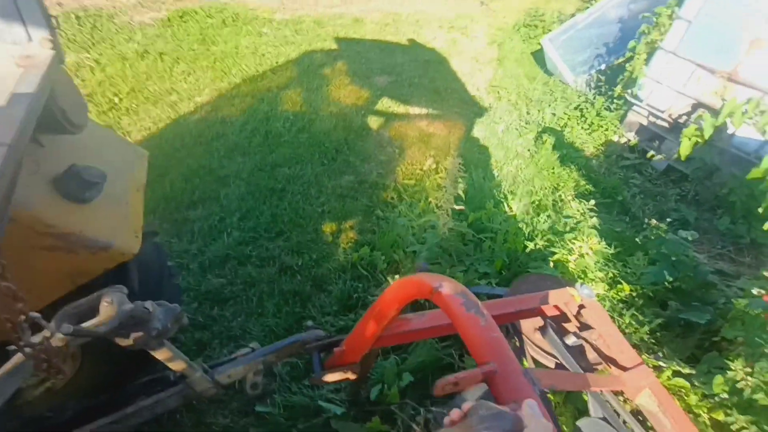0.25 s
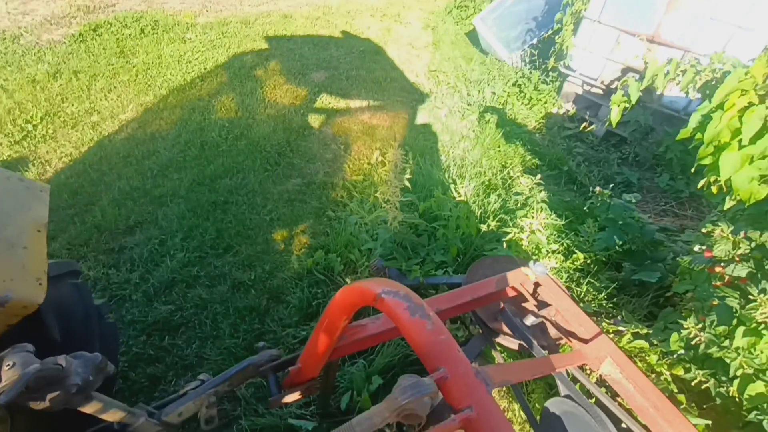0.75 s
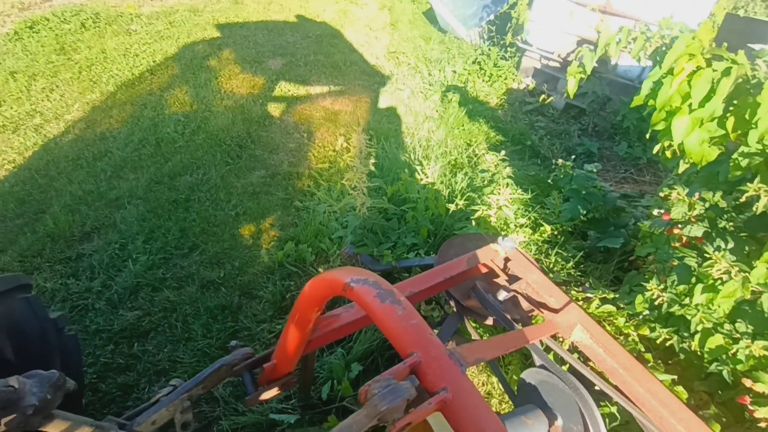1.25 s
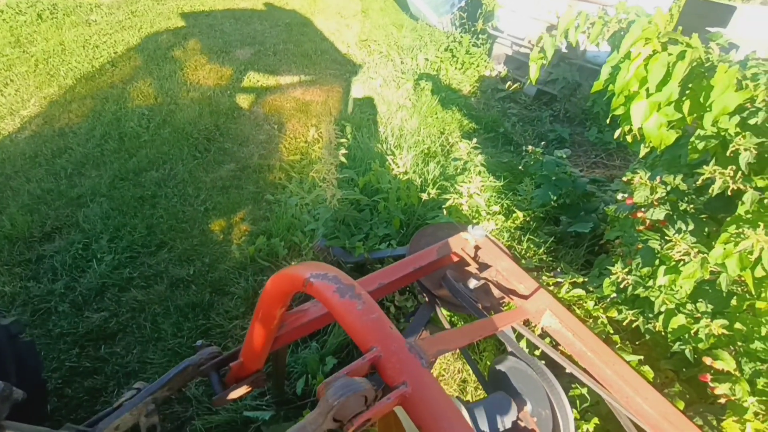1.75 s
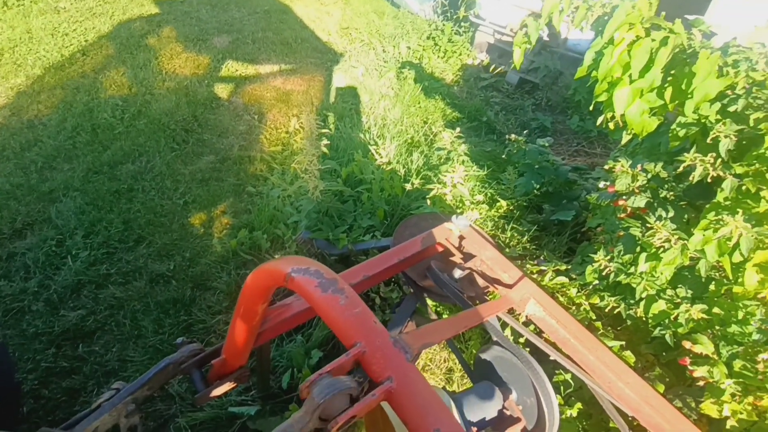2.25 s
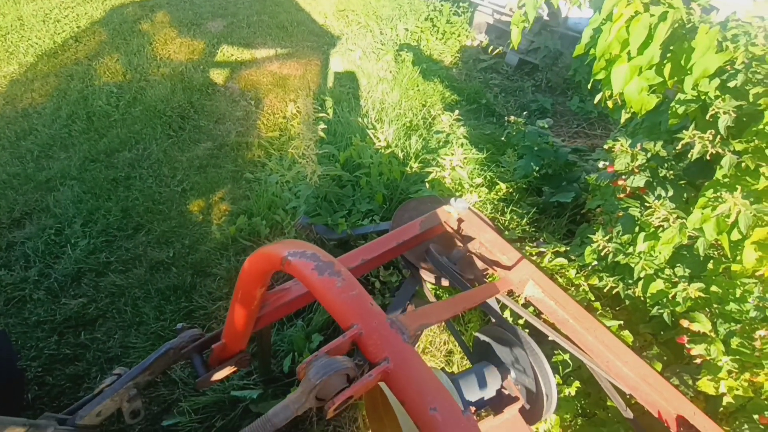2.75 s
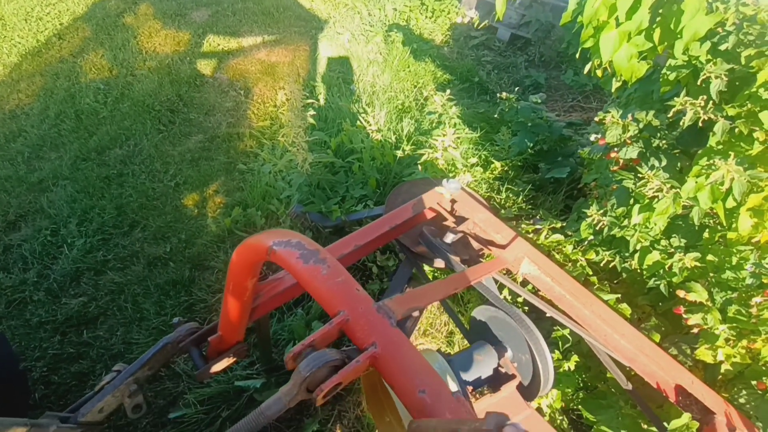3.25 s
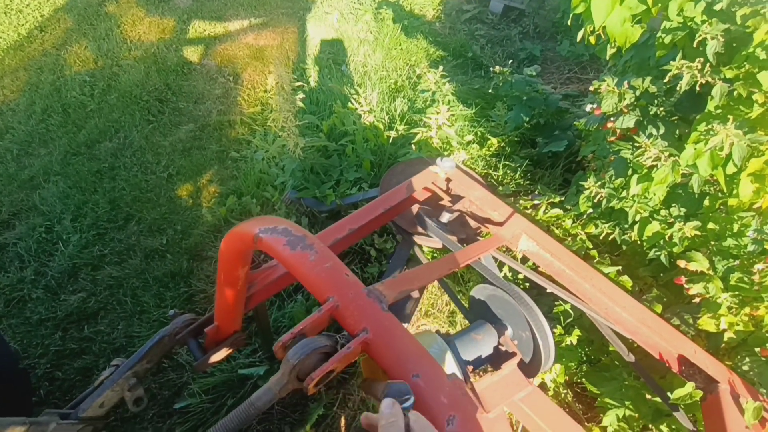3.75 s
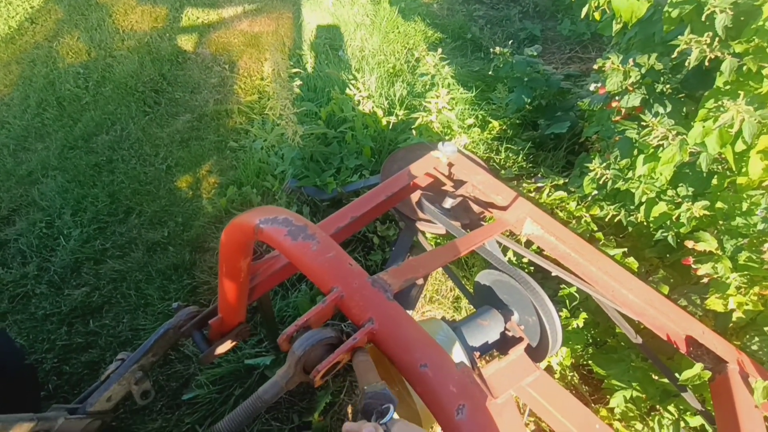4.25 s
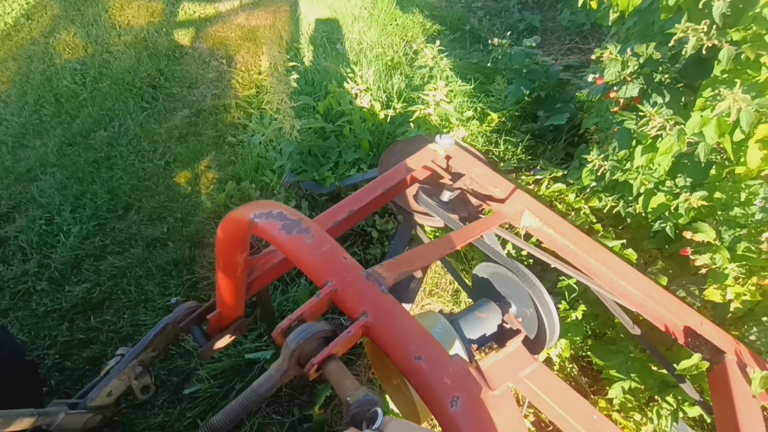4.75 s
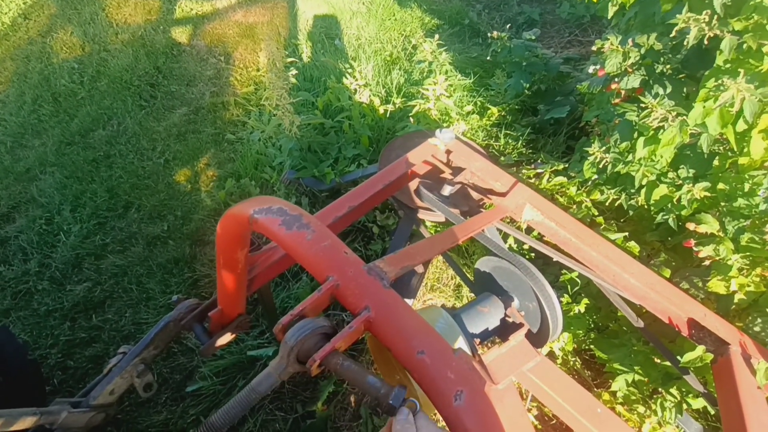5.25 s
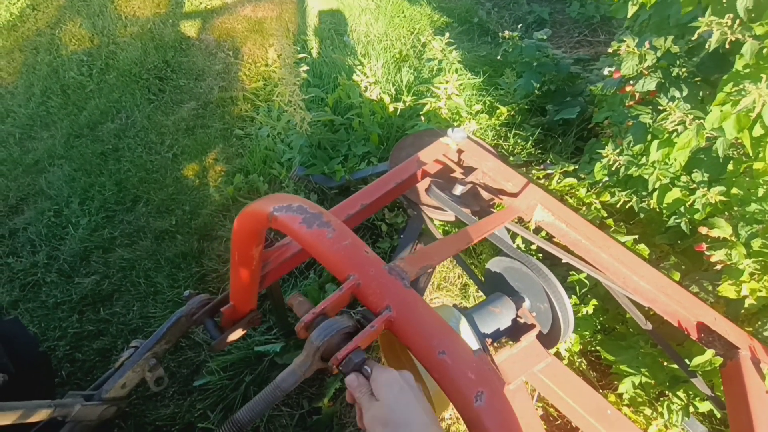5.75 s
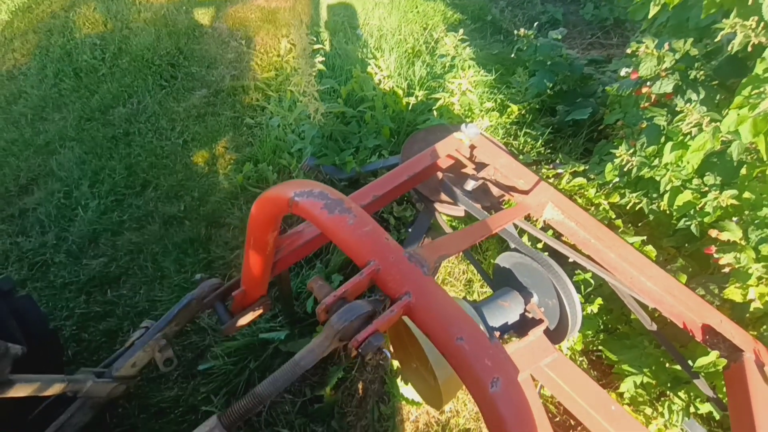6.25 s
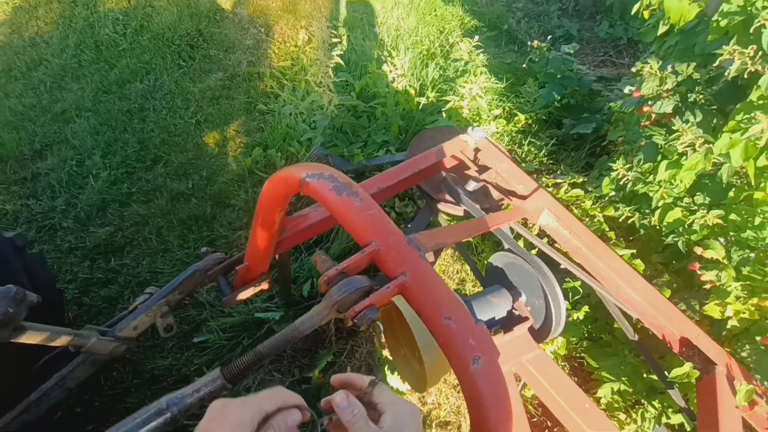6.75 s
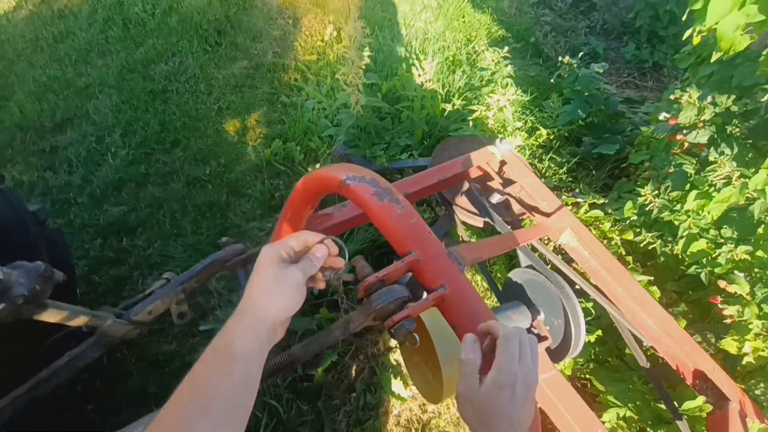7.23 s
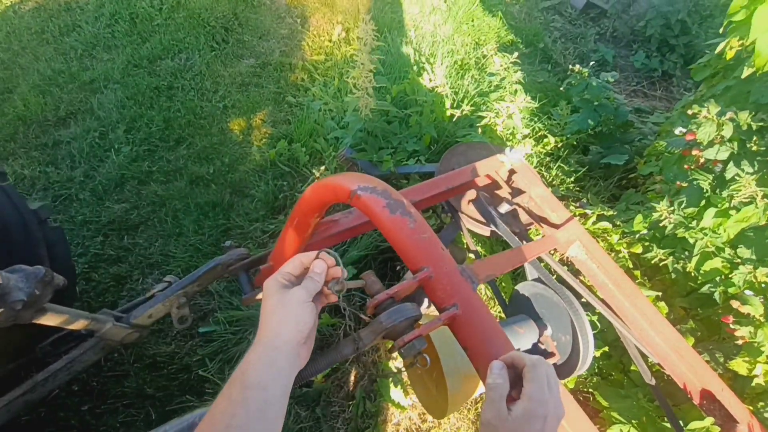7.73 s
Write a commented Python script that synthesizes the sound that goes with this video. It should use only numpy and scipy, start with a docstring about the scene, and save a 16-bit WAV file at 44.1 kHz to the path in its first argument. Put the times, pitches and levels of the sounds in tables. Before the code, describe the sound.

A diesel tractor idles very slowly a few metres to the left, with low exhaust thumps, rattling knocks and light ticking. Close in front, a steel hitch link is turned by hand, giving irregular sharp clanks that ring briefly. Near the end the clanks stop and a small metal pin clinks a few times. The engine runs evenly throughout, outdoors on open grass.

```python
"""A diesel tractor idles very slowly, a few metres to the left, on open grass. In each cycle three strong gas
pulses and a faint one excite the silencer's low resonance as thumps. Impacts in the block make four rattling
knocks with lighter ones between, the injector ticks sharply as each cycle opens, and the valve gear ticks.
Close by, the steel top link of the hitch is turned by hand: impacts in its loose joints set its modes ringing
as clanks, and its pin clinks."""
import sys
import numpy as np
from scipy import signal
from scipy.fft import rfft, irfft
from scipy.io import wavfile
from scipy.ndimage import uniform_filter1d

SR = 44100
rng = np.random.default_rng(int(sys.argv[2]) if len(sys.argv) > 2 else 0)


def waveform_to_disk(signal):
    """Save audio, clipped to [-1, 1], as 16-bit WAV at the path in sys.argv[1]."""
    frames = np.transpose(np.atleast_2d(signal))
    scaled = np.clip(frames, -1, 1) * 32767
    samples = np.round(scaled).astype(np.int16)
    wavfile.write(sys.argv[1], SR, samples)


N = 352344
TIME = np.arange(N) / SR
TAIL = TIME[:SR // 2]  # time since an impact


def undb(db):
    """Amplitude ratio of a level in decibels."""
    return 10 ** (np.asarray(db) / 20)


def unit(x):
    """Normalisation to rms 1."""
    return x / np.sqrt(np.mean(x ** 2))


def unit_onset(x, size=1024):
    """Normalisation to rms 1 over the onset."""
    return x / np.sqrt(np.mean(x[:, :size] ** 2))


def fade(t, t60):
    """Damping: exponential decay, 60 dB down after t60."""
    return np.exp(-np.log(1000) * t / t60)


def add(out, start, x):
    """Superposition of x on out from a start time in seconds."""
    i = int(start * SR)
    a, b = max(i, 0), min(i + x.shape[-1], N)
    if b > a:
        out[..., a:b] += x[..., a - i:b - i]


def colour(x, hz, db, size=1024):
    """Minimum-phase filter through (frequency, level) points."""
    f = np.maximum(np.arange(size // 2 + 1) * SR / size, 1)
    cepstrum = irfft(np.log(undb(np.interp(np.log(f), np.log(hz), db))))
    cepstrum[1:size // 2] *= 2
    cepstrum[size // 2 + 1:] = 0
    response = irfft(np.exp(rfft(cepstrum)))
    return signal.fftconvolve(x, response[None], axes=-1)[:, :x.shape[-1]]


def resonate(x, hz, q):
    """Forced response of a single resonance."""
    return signal.lfilter(*signal.iirpeak(hz, q, SR), x)


# Limits of the body, middle, edge, sheen and top bands: (frequency [Hz])
BAND_EDGES = np.array([400, 1100, 2400, 4400, 7000, 12000])

def shape_bands(x, band_db, bass_db, air_db):
    """Spectral envelope: five band levels for a white sound, with offsets at the two ends."""
    density_db = np.asarray(band_db) - 10 * np.log10(np.diff(BAND_EDGES) / (SR / 2))
    centres = np.sqrt(BAND_EDGES[1:] * BAND_EDGES[:-1])
    return colour(x, [150, *centres, 14000], [density_db[0] + bass_db, *density_db, density_db[-1] + air_db])


def grit(spread_db, scatter):
    """Contact noise: dense clicks of uneven size, partly scattered differently to each side."""
    noise = rng.standard_normal((3, len(TAIL))) * undb(spread_db * rng.standard_normal(len(TAIL)))
    return unit(noise[0] + scatter * noise[1:])


def ring(modes, vary_db, scatter):
    """Free vibration: a sum of damped modes, weighted anew for each blow and each side."""
    hz, db, t60 = np.transpose(modes)
    chance = rng.standard_normal((6, len(hz)))
    weight = undb(db + vary_db * chance[0]) * np.exp(2j * np.pi * chance[1])
    sides = 1 + scatter * (chance[2:4] + 1j * chance[4:])
    partials = np.exp(2j * np.pi * hz[:, None] * TAIL) * fade(TAIL, t60[:, None])
    return ((weight * sides) @ partials).imag


# Modes of the pin's spring ring and of its shank: (frequency [Hz], level [dB], t60 [s])
SPRING_MODES = [(4441, -13, .2), (5798, 1, .07), (7192, -4, .055), (8215, -22, .12), (10933, -16, .08),
                (13991, -14, .05), (15407, -23, .05)]
SHANK_MODES = [(1700, -16, .04), (3219, -15, .06), (4156, -12, .05), (4603, -8, .04), (6200, -10, .03),
               (6562, -6, .022), (6950, 0, .012), (7120, 2, .016), (7350, -2, .012), (9588, -11, .022)]
# Taps of the pin: (time [s], level [dB], spring gain [dB], shank gain [dB])
CLINKS = [(5.984, -30.5, -15, -2), (7.161, -49.5, 6, -13), (7.181, -36, -2, -22), (7.187, -28.5, -2.5, -21),
          (7.466, -50, -1, -10), (7.526, -46.5, -7, -5), (7.751, -51, 2.5, -7), (7.918, -47.5, -4, -7)]

def pin_clinks():
    """Impact excitation: the well-damped shank clicks and the lightly damped spring rings."""
    out = np.zeros((2, N))
    for start, db, spring_db, shank_db in CLINKS:
        shank = unit_onset(ring(SHANK_MODES, vary_db=2, scatter=.15))
        shank += .12 * unit_onset(grit(spread_db=1, scatter=.4) * fade(TAIL, .012))
        spring = unit_onset(ring(SPRING_MODES, vary_db=1, scatter=.1) * np.minimum(TAIL / .0015, 1))
        add(out, start, undb(db) * (undb(spring_db) * spring + undb(shank_db) * shank))
    return out


def frame_ring(chatter, low_t60=.38, middle_t60=.16, top_t60=.076):
    """Frequency-dependent damping: once chatter ends, the frame's dense modes lose their treble first."""
    noise = grit(spread_db=1, scatter=1.77)
    noise = colour(noise, np.geomspace(500, 14000, 110), 4 * rng.standard_normal(110))
    low, below_top = (signal.sosfiltfilt(signal.butter(2, hz, fs=SR, output="sos"), noise)
                      for hz in (1300, 5500))
    middle, top = below_top - low, noise - below_top
    free = np.maximum(TAIL - chatter, 0)
    return low * fade(free, low_t60) + middle * fade(free, middle_t60) + top * fade(free, top_t60)


def joint_contacts(chatter, rate_hz=260, settle_s=.029, jolt=.15):
    """Stick-slip envelope: the joint hits, then slips and catches, and the energies add."""
    times = np.append(0, rng.uniform(0, chatter, int(rate_hz * chatter) + 1))
    age = TAIL - times[:, None]
    strength = np.append(1.5, rng.uniform(.21, 1, len(times) - 1))
    decays = (age >= 0) * np.exp(-np.abs(age) / settle_s)
    return np.sqrt(1 + jolt * strength @ decays)


# Colour common to all clanks, middle to top band: (gain [dB])
CLANK_COLOUR = [2.5, -1, -0.87, -6.5]

def clank_bands(db, pitch_hz, focus, thud_db):
    """Resonance curve: band levels form a hump around the contact's pitch, above the frame's thud."""
    hz = np.sqrt(BAND_EDGES[2:] * BAND_EDGES[1:-1])
    hump_db = -10 * np.log10(1 + (focus * (hz / pitch_hz - pitch_hz / hz)) ** 2)
    return [thud_db, *(db + hump_db + CLANK_COLOUR)]


def balance_blow(blow, band_db, chatter):
    """Energy distribution: the onset of a blow is brought towards the given band levels."""
    size = int(max(chatter, .023) * SR)
    hz, gain_db = np.fft.rfftfreq(size, 1 / SR), np.array(band_db, float)
    for _ in range(2):
        onset = shape_bands(blow, gain_db, bass_db=-8, air_db=-22)[:, :size]
        power = 2 * np.mean(np.abs(rfft(onset) / size) ** 2, axis=0)
        band_power = np.histogram(hz, BAND_EDGES, weights=power)[0]
        gain_db = gain_db + band_db - 10 * np.log10(band_power)
    return shape_bands(blow, gain_db, bass_db=-15.5, air_db=-22)


# Modes of the link's tube and of its bracket: (frequency [Hz], level [dB], t60 [s])
TUBE_MODES = [(865, -14, .4), (935, -16, .35), (1070, -14, .18), (1227, -13, .22), (1348, -8, .27),
              (1466, -11, .33), (1521, -5, .15), (2232, -1, .19), (2739, -7, .17), (2854, -3, .2),
              (2902, -10, .25), (3214, -12, .22), (3411, -9, .13), (3640, -9, .1), (3790, -10, .1),
              (4002, -4, .11), (4150, -8, .09), (4385, -7, .1), (4786, -15, .18), (5733, -15, .11),
              (7187, -18, .12), (8220, -13, .12)]
BRACKET_MODES = [(593, -17, .3), (1520, -14, .15), (1636, -16, .15), (2659, -12, .17), (3030, -8, .19),
                 (3150, -11, .15), (3500, -11, .11), (3890, -9, .15), (4310, -9, .12), (4385, -8, .15),
                 (4594, 0, .14), (5120, -10, .16), (5370, -12, .12), (5960, -12, .09), (6300, -7, .09),
                 (6460, -5, .1), (7230, -12, .08), (8190, -11, .1), (9232, -15, .1)]
# Impacts of the link: (time [s], chatter [s], level [dB], pitch [Hz], focus [Q], frame thud [dB])
CLANKS = [(.559, 0.012, -22, 3230, 2, -40.5), (.588, 0.013, -33, 2210, 1.25, -41),
          (.781, 0.013, -19, 4570, 5.3, -53), (.947, 0.019, -29.5, 4440, 1.5, -31.5),
          (.972, .008, -36, 1410, 3.4, -34), (1.305, 0.015, -24.5, 3800, 3.1, -50),
          (1.314, 0.015, -19.5, 4690, 1.05, -36), (1.804, 0.012, -39.5, 3520, 2.4, -56),
          (2.0, 0.062, -48, 2910, 2.9, -52), (2.067, 0.016, -28.5, 3830, 5.5, -55),
          (2.279, 0.027, -41, 2800, 2.7, -67), (2.371, 0.044, -40, 3000, 3, -45),
          (3.174, 0.0073, -14.5, 4760, 2.27, -50), (3.274, 0.019, -30, 1820, 0.86, -32.5),
          (3.737, .012, -24, 3370, 1.44, -38), (3.866, 0.014, -20, 2600, 1.28, -33),
          (4.089, 0.019, -24, 2940, 5, -39), (4.662, 0.062, -39, 2800, 4.7, -58),
          (4.712, .011, -35, 2140, 2.6, -40.5), (4.829, 0.013, -27.5, 3030, 1.77, -38),
          (4.991, 0.016, -40.5, 2180, 2.1, -44), (5.161, 0.037, -29.5, 2580, 3.34, -40),
          (5.617, 0.024, -26, 2920, 2.6, -33.5), (5.675, 0.031, -32, 2480, 1.3, -34.5),
          (5.735, 0.046, -30, 2400, 4.2, -38), (5.802, 0.0092, -25, 4500, 1.05, -29),
          (5.822, .01, -40.5, 1200, 2.1, -38)]

def link_clanks(middling_hz=3125, middling_q=2.15):
    """Modal ringing: the link drops across its slack and excites frame, tube, bracket and joint."""
    out = np.zeros((2, N))
    for start, chatter, db, hz, focus, thud_db in CLANKS:
        # Higher clanks favour the bracket over the tube and lie further left.
        octaves = np.log2(hz / middling_hz)
        tube_db, bracket_db = -3.5 - 15.5 * max(octaves, 0), -11.5 + 13 * octaves
        pan_db = -2.5 + 2 * octaves
        ring_db = 2.5 * np.log2(focus / middling_q)  # focused clanks ring more strongly
        tube = undb(tube_db) * unit_onset(ring(TUBE_MODES, vary_db=1.5, scatter=.67))
        bracket = undb(bracket_db) * unit_onset(ring(BRACKET_MODES, vary_db=-.5, scatter=.52))
        frame = unit_onset(frame_ring(chatter) * joint_contacts(chatter))
        swell = 1 - np.exp(-4 * TAIL / chatter)
        blow = frame + undb(ring_db) * swell * (tube + bracket)
        ping = undb(-6 + 2 * ring_db) * resonate(blow, hz, q=11)
        clank = balance_blow(blow + ping, clank_bands(db, hz, focus, thud_db), chatter)
        add(out, start, clank * undb([[pan_db / 2], [-pan_db / 2]]))
    return out


# Drift of the idle: (time [s], lag [s], exhaust gain [dB], clatter gain [dB], valve gain [dB])
IDLE = [(-.25, -0.0043, -27.5, 2.5, 1.5), (.72, 0.0025, -30.5, 2, 2.5), (1.899, 0.0052, -31.5, 0, 2.5),
        (3.14, 0.00057, -32, -2, -0.5), (4.0, -0.0043, -34.5, -2, 6), (4.799, 0.0027, -31, -0.5, -4.5),
        (5.799, -.001, -32.5, -1, 8), (6.52, 0, -31, -0.5, -6.5), (7, 0.0051, -30.5, 1, 1.5),
        (7.97, -0.0036, -32.5, .5, -14)]

def engine_cycles(period_s=.48364, first_s=.2377):
    """Governor hunting modulates an even beat: rows of (start, exhaust, clatter and valve gains)."""
    beat = first_s + period_s * np.arange(-1, N / SR / period_s)
    times, *controls = np.transpose(IDLE)
    lag, *levels = (np.interp(beat, times, control) for control in controls)
    return np.transpose([beat + lag, *levels])


# Spectrum of the engine's steady noise: (frequency [Hz], relative spectral density [dB])
CHURN = [(18, -25), (30, -14), (111, 4.5), (182, -4), (518, -7), (591, -5), (767, -11.5), (1080, -12.5),
         (1590, -19), (2020, -23), (3230, -25.5), (6210, -36.5), (8950, -47), (12300, -49), (15500, -52)]

def engine_churn(level_db=-46):
    """Broadband noise from fan, gears and gas flow fills the gaps between the strokes."""
    hz, db = np.transpose(CHURN)
    noise = colour(rng.standard_normal((3, N)), hz, db, size=4096)
    direct, scattered = noise[:1], colour(noise[1:], [120, 500, 3000], [-20, -4, -2])
    churn = signal.sosfilt(signal.butter(1, 90, "high", fs=SR, output="sos"), direct + scattered)
    starts, _, clatter_db, _ = engine_cycles().T
    return unit(churn) * undb(level_db + np.interp(TIME, starts, clatter_db))


def iron_rattle(body_db, vary_db):
    """Source and filter: dense contacts excite the uneven resonances of cast iron, varying by stroke."""
    contacts = grit(spread_db=3, scatter=1)
    response_db = body_db + vary_db * rng.standard_normal(64)
    return unit(colour(contacts, np.geomspace(300, 15000, 64), response_db))


# Valve ticks of one cycle: (delay [s], relative treble level [dB], relative middle level [dB])
VALVES = [(.112, -37, -43.5), (.273, -48.5, -56.5), (.354, -40, -45)]

def valve_ticks(rise_s=.006, jitter_s=.0015, vary_db=3.5, seat_s=.013, seat_db=-7):
    """Periodic impacts: the valve gear snaps brightly, then a duller tap follows as the valve seats."""
    out = np.zeros((2, N))
    for delay, top_db, mid_db in VALVES:
        snaps, taps = np.zeros((2, 2, N))
        for start, _, _, valve_db in engine_cycles():
            early_late, force = rng.standard_normal(2)
            onset = start + delay + jitter_s * early_late
            snap = undb(valve_db + vary_db * force) * iron_rattle(0, vary_db=4)
            add(snaps, onset, snap * np.minimum(TAIL / rise_s, 1) * fade(TAIL, .091))
            add(taps, onset + seat_s, grit(spread_db=2, scatter=.4) * fade(TAIL, .065))
        snap_db = [mid_db - 19, mid_db + 3, mid_db - 5, (mid_db + top_db) / 2 - 4.5, top_db - 7.5]
        tap_db = np.array([-4.5, 41.5, 26, 23, -17.5]) + mid_db + seat_db
        out += shape_bands(snaps, snap_db, bass_db=7, air_db=-9.5)
        out += colour(taps, [150, 370, 600, 1000, 2500], tap_db)
    return undb(-3) * out


# Knocks of one cycle, the first row being the injector's sharp tick: (delay [s], rise [s], t60 [s], leading
# resonance [Hz], relative levels of the body, middle, edge, sheen and top bands [dB])
KNOCKS = [(-.002, 0.00076, 0.082, 6860, -58, -45.5, -48.5, -47.5, -59),
          (.004, 0.0081, 0.25, 2110, -40.5, -42, -55.5, -50.5, -60),
          (.173, 0.022, 0.12, 2720, -45, -41.5, -47.5, -52.5, -63),
          (.237, 0.0028, 0.27, 2070, -45.5, -44, -52.5, -48, -62),
          (.417, 0.013, 0.15, 1664, -42.5, -42.5, -43.5, -49.5, -60.5),
          (0.24, 0.045, 0.043, 6200, -55, -55, -60, -69.5, -87.5),
          (.066, 0.0062, 0.15, 6000, -53, -77, -52, -61, -68)]
# Resonances of the engine block: (frequency [Hz], bandwidth [Hz], gain [dB])
BLOCK_MODES = [(402, 135, 2), (430, 43, -13), (1028, 61, 9), (2060, 240, -13), (3710, 72, 5.5),
               (4310, 110, -1), (6040, 190, 2), (7700, 290, 0)]

def block_knocks(hold_s=.008, jitter_s=.001, vary_db=1.23):
    """Backlash: pistons and gears take up their slack in bursts of rattle that resonate in the block; the first
    row is instead the injector's sharp tick."""
    out = 0
    for delay, rise, t60, hz, *band_db in KNOCKS:
        train, body_db = np.zeros((2, N)), 4 * rng.standard_normal(64)
        envelope = np.minimum(TAIL / rise, 1) * fade(np.maximum(TAIL - rise - hold_s, 0), t60)
        for start, _, clatter_db, _ in engine_cycles():
            early_late, force = rng.standard_normal(2)
            stroke = undb(clatter_db + vary_db * force) * envelope * iron_rattle(body_db, vary_db=4.5)
            add(train, start + delay + jitter_s * early_late, stroke)
        train += undb(-2.5) * resonate(train, hz, q=12)
        out += shape_bands(train, band_db, bass_db=-3.5, air_db=-10)
    block = sum(undb(db) * resonate(out, hz, hz / width) for hz, width, db in BLOCK_MODES)
    return undb(-4) * (out + block)


# Exhaust pulses of one cycle: (crest delay [s], pitch [Hz], swell [s], decay [s], relative level [dB])
THUMPS = [(.024, 104.4, 0.016, .016, 4), (0.086, 110.6, .013, 0.019, 3.5), (.262, 108, 0.015, 0.02, 0),
          (.311, 93, 0.0086, 0.012, -10)]

def exhaust_thumps(glide=1.1, gas_hz=225, gas_db=-16.5, gust_lead_s=.01, roughness=.32):
    """Cavity resonance: each puff swells in the silencer and sags in pitch, a gust of gas on its front."""
    tone, gust = np.zeros((2, N))
    t = TAIL[:SR // 5] - .06  # time from the crest
    for start, exhaust_db, _, _ in engine_cycles():
        for delay, hz, swell, decay, db in THUMPS:
            detune, shift, stray_db = rng.standard_normal(3)
            phase = 2 * np.pi * (hz * (1 + .051 * detune) * (t - glide * t ** 2) + .18 * shift)
            envelope = np.where(t < 0, np.exp(-.5 * (t / swell) ** 2), 1 / np.cosh(t / decay * 1.5))
            envelope *= undb(exhaust_db + db + stray_db)
            onset = start + delay + t[0]
            add(tone, onset, envelope * np.sin(phase))
            add(gust, onset - gust_lead_s, envelope)
    flutter = unit(uniform_filter1d(rng.standard_normal(N), SR // 150))
    gas_band = signal.butter(2, [gas_hz * .72, gas_hz * 1.17], "band", fs=SR)
    gas = unit(signal.lfilter(*gas_band, rng.standard_normal(N)))
    return np.tile(tone * (1 + roughness * flutter) + undb(gas_db) * gust * gas, (2, 1))


def place(x, lead_ms, pan_db):
    """Localisation: sound from the left reaches the left side earlier and louder."""
    right = np.interp(TIME - lead_ms / 1000, TIME, x[1])
    return np.array([x[0] * undb(pan_db / 2), right * undb(-pan_db / 2)])


def scene():
    """Superposition: the engine to the left, its exhaust nearer the middle, the hitch ahead."""
    exhaust = place(exhaust_thumps(), lead_ms=.34, pan_db=1.5)
    engine = place(block_knocks() + valve_ticks() + engine_churn(), lead_ms=.43, pan_db=3)
    link = place(link_clanks(), lead_ms=-.048, pan_db=1.5)
    pin = place(pin_clinks(), lead_ms=.034, pan_db=4.5)
    return exhaust + engine + link + pin


def record(dry):
    """Band limiting removes the deepest bass and the highest treble."""
    thin = signal.sosfilt(signal.butter(3, 42, "high", fs=SR, output="sos"), dry)
    return signal.sosfilt(signal.ellip(8, .2, 70, 15600, fs=SR, output="sos"), thin)


dry = scene()
out = record(dry)
waveform_to_disk(out)
```